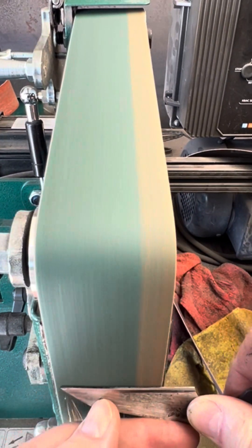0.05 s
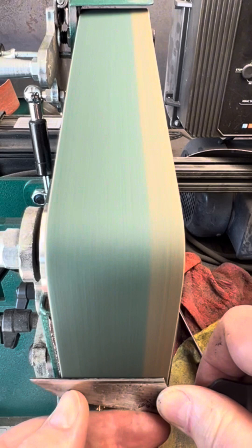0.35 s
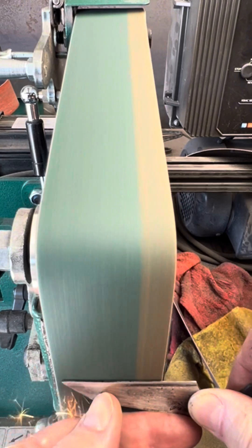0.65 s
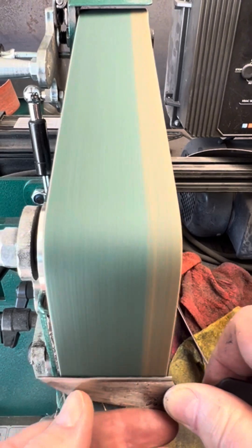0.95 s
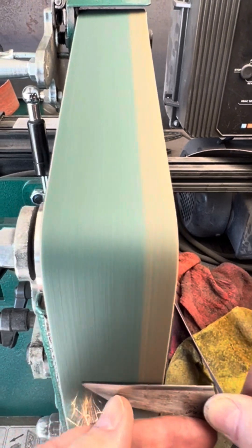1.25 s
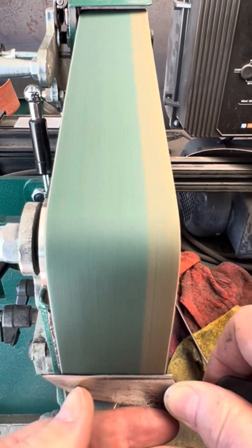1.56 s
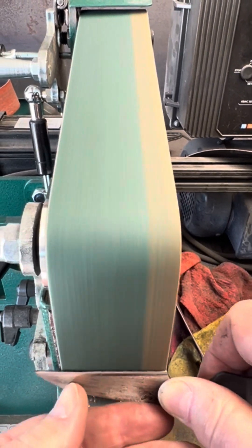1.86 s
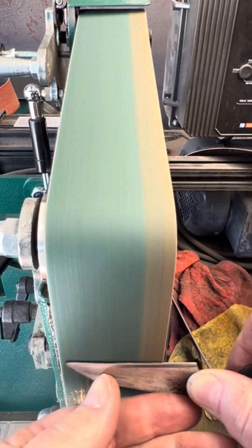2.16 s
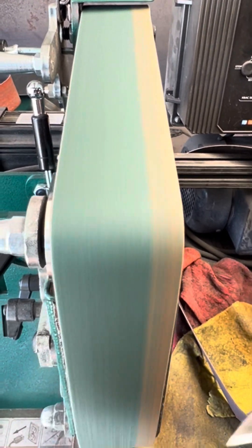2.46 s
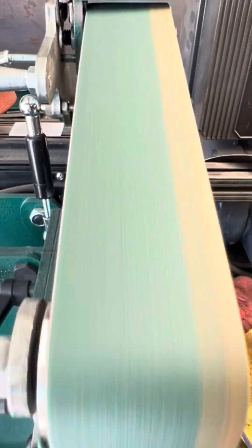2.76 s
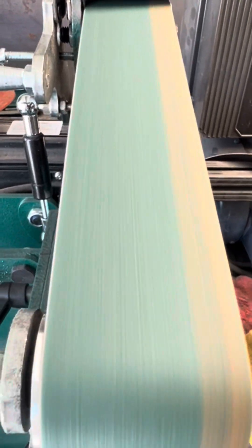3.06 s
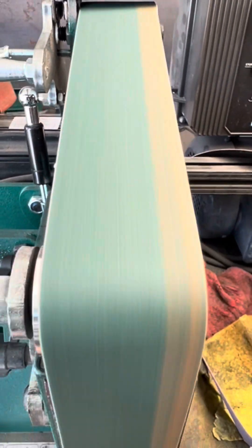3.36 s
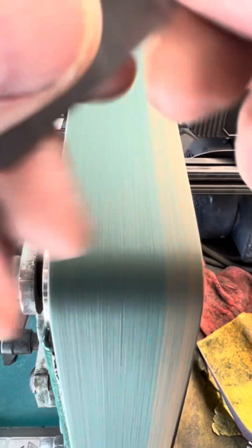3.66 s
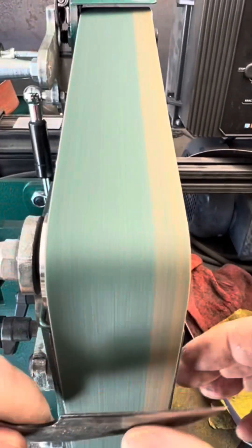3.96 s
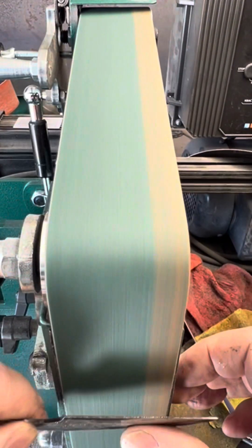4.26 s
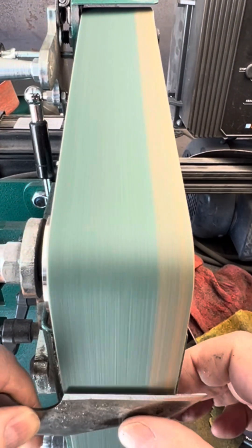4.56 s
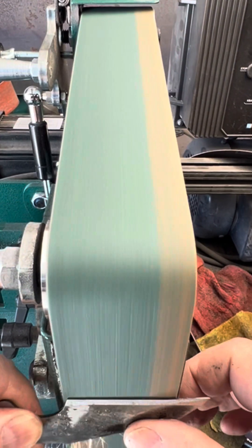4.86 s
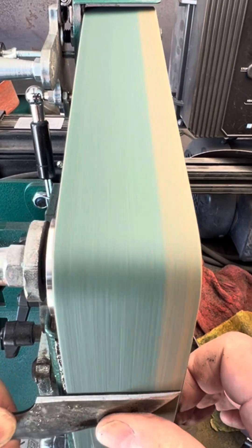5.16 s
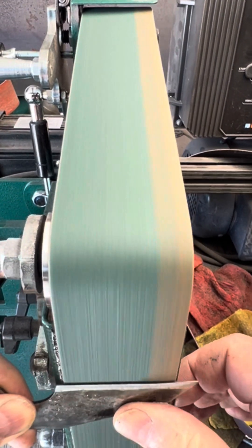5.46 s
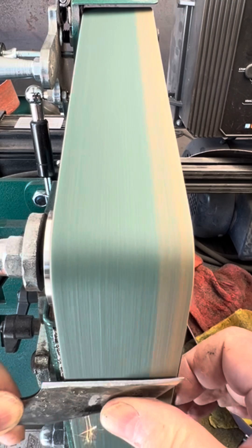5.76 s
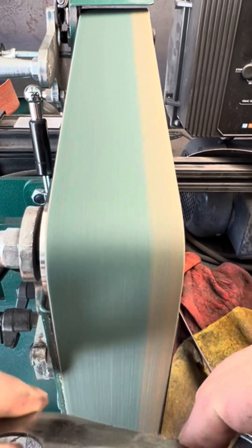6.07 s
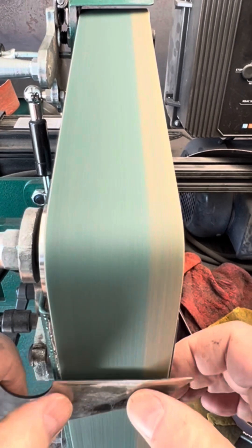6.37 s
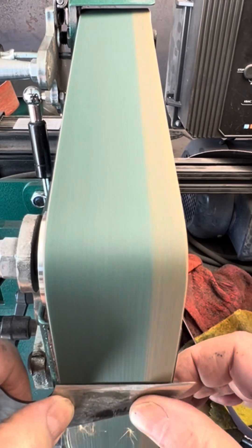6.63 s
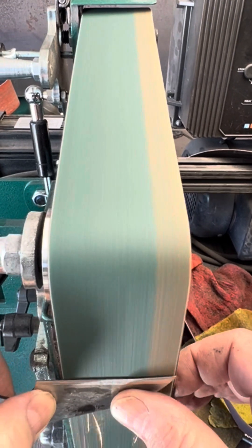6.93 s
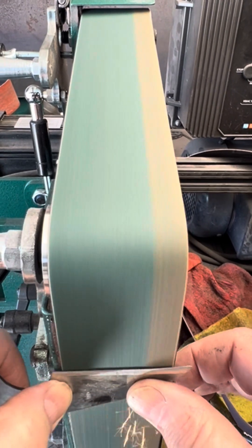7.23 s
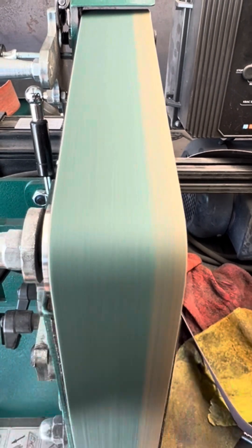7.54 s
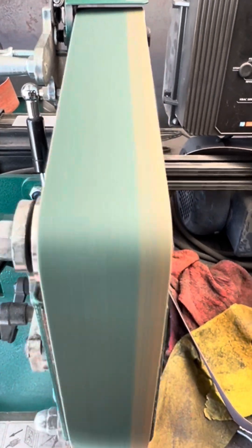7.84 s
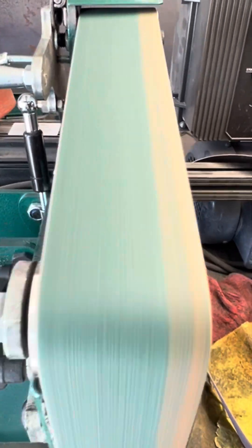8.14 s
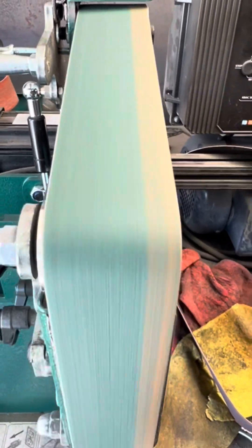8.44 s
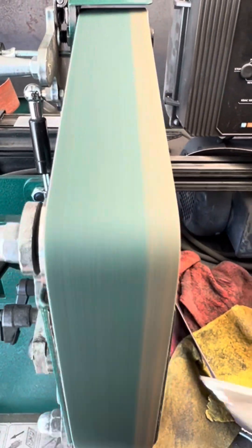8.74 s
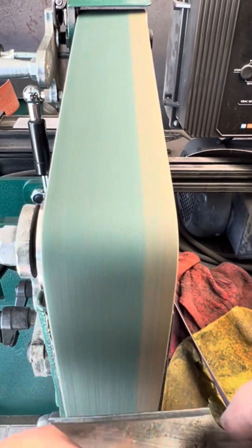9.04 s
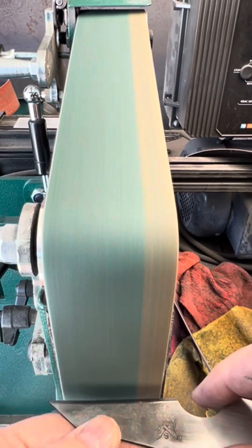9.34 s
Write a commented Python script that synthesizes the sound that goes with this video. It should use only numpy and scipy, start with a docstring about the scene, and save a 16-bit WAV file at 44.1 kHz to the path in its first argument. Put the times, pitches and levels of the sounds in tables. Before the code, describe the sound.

Three high, hissing passes of a steel blade on an abrasive belt, over the close whine and rapid knocking of a running belt grinder.

```python
"""In a workshop, close to a running belt grinder, a steel blade is pressed on the belt three times.
The belt repeats its hiss and the knock of its splice every lap; the drive whines and sags under load.
Grit tears at the steel, which rings very high, first on one face, then twice on the other.
Faint hums, three ticks, puffs of air on the microphone and one soft bump pass by.
Gain control ducks the machine under each pass and lets it swell again in the pauses."""
import sys
import numpy as np
from scipy import signal
from scipy.fft import rfft, irfft
from scipy.io import wavfile
from scipy.ndimage import uniform_filter1d

SR = 44100
rng = np.random.default_rng(int(sys.argv[2]) if len(sys.argv) > 2 else 0)


def generate_wav(sig):
    """Save sig (samples, or channels by samples) to the path in sys.argv[1] as 16-bit PCM at SR."""
    pcm = np.round(np.clip(np.atleast_2d(sig).T, -1, 1) * 32767).astype(np.int16)
    wavfile.write(sys.argv[1], SR, pcm)


N = 418950
T, BIN_HZ = np.arange(N) / SR, np.fft.rfftfreq(N, 1 / SR)
LAP_HZ, WHINE_CYCLES_PER_LAP, BAND_LIMIT_HZ = 23.45, 47.48, 15760
LAP_HARMONICS_HZ = np.arange(0, BAND_LIMIT_HZ + 500, LAP_HZ)


def amp(db):
    """Decibels to gain."""
    return 10 ** (np.asarray(db) / 20)


def unit(x):
    """Scales to rms 1."""
    return x / np.sqrt(np.mean(abs(x) ** 2) + 1e-20)


def curve(points, t=T):
    """An automation curve read at the times t."""
    return np.interp(t, *np.transpose(points))


def spectrum_db(points, hz):
    """An EQ curve read on a log-frequency axis."""
    f, db = np.transpose(points)
    return np.interp(np.log(hz + 1), np.log(f), db)


def bell(x, centre, width):
    """A smooth hump of height 1."""
    return np.exp(-2 * ((x - centre) / width) ** 2)


def peaks_db(peaks, hz):
    """The boost or cut of a set of resonances."""
    return sum(db / (1 + (2 * (hz - f) / width) ** 2) for f, width, db in peaks)


def eq(x, gain_db):
    """Filters x by one gain per bin of BIN_HZ."""
    return irfft(rfft(x) * amp(gain_db), N)


def moving_eq(x, gain_db):
    """Filters x by gain_db(f, t), which moves in time."""
    f, t, frames = signal.stft(x, SR, nperseg=512, noverlap=384)
    return signal.istft(frames * amp(gain_db(f[:, None], t)), SR, nperseg=512, noverlap=384)[1][:N]


def noise(points):
    """Steady noise of a given spectrum, rms 1."""
    return unit(eq(rng.standard_normal(N), spectrum_db(points, BIN_HZ)))


def drift(rate_hz):
    """A random wobble, rms 1."""
    return unit(irfft(rfft(rng.standard_normal(N)) * bell(BIN_HZ, 0, 2 * rate_hz), N))


def looped(harmonics, laps, size=16384):
    """Plays one lap of the belt over and over."""
    return unit(np.interp(laps % 1, np.arange(size) / size, irfft(harmonics, size)))


# Belt speed, as the pitch of the drive whine: t/s, f/Hz
WHINE_PITCH = [(0.0, 1125.8), (0.06, 1130.0), (0.16, 1114.1), (0.48, 1109.5), (0.56, 1134.2), (0.7, 1132.8),
               (0.78, 1109.8), (0.86, 1116.8), (0.96, 1132.4), (1.24, 1134.6), (1.3, 1108.0),
               (1.42, 1113.2), (1.58, 1111.6), (1.65, 1132.5), (1.76, 1110.7), (1.9, 1135.8),
               (2.06, 1114.4), (2.18, 1123.9), (2.28, 1114.4), (3.2, 1113.0), (4.56, 1108.7),
               (4.67, 1098.1), (4.85, 1115.5), (5.5, 1114.3), (5.68, 1135.8), (5.92, 1114.1),
               (5.99, 1127.1), (6.41, 1127.1), (6.46, 1100.5), (6.8, 1112.7), (6.89, 1126.0), (7.0, 1110.2),
               (7.2, 1108.7), (7.27, 1120.2), (7.45, 1140.4), (7.55, 1128.6), (8.2, 1122.3), (9.5, 1117.5)]
def belt_laps(start_lap=0.211):
    """Counts the laps of the belt, which slows whenever the hand leans on the blade."""
    return start_lap + np.cumsum(curve(WHINE_PITCH)) / SR / WHINE_CYCLES_PER_LAP


# Tone of the belt's hiss: f/Hz, level/dB
HISS_SPECTRUM = [(150, -37), (400, -3), (950, -7.5), (1450, -3), (2200, 0), (3000, -0.5), (4200, -2),
                 (5500, 8.5), (7000, 4), (8300, 9.5), (10500, 0), (13200, -0.5), (14500, -1), (15700, -6)]
# Resonances in the hiss: f/Hz, width/Hz, boost/dB
HISS_PEAKS = [(3530, 130, 5), (3573, 150, 9.5), (6020, 140, 0), (6550, 71, 9.5), (7490, 75, 10),
              (7740, 42, 10.5), (7964, 99, 8.5), (8310, 100, 13), (8490, 240, 3.5)]
# High shelf riding on the hiss: t/s, boost/dB
HISS_SHELF = [(2.47, 9.5), (2.6, 5), (3.2, 5), (3.55, 8), (3.9, 10), (6.4, 10.5), (7.82, 8.5), (7.92, 5),
              (8.3, 4.5), (8.9, 8), (9.5, 11.5)]
def belt_hiss(laps, level_db=-23, air_db=-15, swell_db=1.32, swell_lap=0.13):
    """The same grit passes every lap, so the hiss loops, swelling behind the splice, over fresh air."""
    hz = LAP_HARMONICS_HZ
    scatter_db = 4 * np.minimum(rng.standard_normal(len(hz)), 1.6)
    grit = amp(spectrum_db(HISS_SPECTRUM, hz) + peaks_db(HISS_PEAKS, hz) + scatter_db)
    hiss = looped(grit * np.exp(2j * np.pi * rng.random(len(hz))) * (hz > 130), laps)
    hiss *= amp(swell_db * np.cos(2 * np.pi * (laps - swell_lap)))
    air = signal.sosfilt(signal.butter(4, 200, "high", fs=SR, output="sos"), noise(HISS_SPECTRUM))

    def tone_db(f, t):
        shelf_db = curve(HISS_SHELF, t) * np.clip((f - 8500) / 3500, 0, 1)
        # the blade swings past the microphone: its reflection lifts the middle and sweeps a notch
        notch_hz = 11200 - 8000 * (t - 3.71)
        reflection_db = 4 * bell(f, 5500, 2200) - 9 * bell(f, notch_hz, 1700)
        return level_db + shelf_db + bell(t, 3.69, 0.16) * reflection_db
    return moving_eq(hiss + amp(air_db) * air, tone_db)


# Wheels and frame, rung in turn by the splice: f/Hz, width/Hz, level/dB, delay/s
FRAME_MODES = [(393.5, 11, -7, 0.00481), (624.2, 22.4, 0.5, 0.00902), (782.7, 7.8, -5.5, .012),
               (824, 4.2, -6.5, 0.013), (1229, 29.8, 2, 0.0003), (1766, 39, -6.5, 0.00344)]
# The splice's crack on the wheel and its softer follow-up: f/Hz, width/Hz, level/dB, delay/s
CRACK_MODES = [(2200, 450, -11, -.0005), (3050, 700, -14, -.0005), (1800, 250, -15, .003),
               (3900, 700, -19, .0098)]
# The microphone leans over the wheel twice, bringing up knock and rush: t/s, nearness/0-1
MIC_NEARNESS = [(2.52, 0), (2.78, 0.89), (3.1, 0.67), (3.5, 0), (4.4, 0), (7.65, 0.06), (8.2, 0.15),
                (8.8, 0)]
def splice(laps, knock_db=-35.5, near_db=7.5, crack_db=-40.5, uneven_db=1.0, loaded_pitch=0.98):
    """Once a lap the belt's joint cracks and knocks over the wheels; the knock drops under the blade."""
    hz = LAP_HARMONICS_HZ

    def struck(modes, pitch=1, rise_to_decay=4.45):
        ring = 0
        for f, width, db, delay in modes:
            detune = 2j * (hz - f * pitch) / width
            mode = 1 / (1 + detune) / (1 + detune / rise_to_decay)  # swells, then dies away
            ring = ring + amp(db) * unit(mode * np.exp(-2j * np.pi * hz * delay))
        return looped(ring * (hz > 200), laps)
    load = np.clip(blade_load(), 0, 1)
    knock = np.sqrt(1 - load) * struck(FRAME_MODES) + np.sqrt(load) * struck(FRAME_MODES, loaded_pitch)
    knock *= amp(knock_db + near_db * curve(MIC_NEARNESS))
    crack = struck(CRACK_MODES) * amp(crack_db)
    return (knock + crack) * amp(uneven_db * drift(32))


# Low rush of the wheels: f/Hz, level/dB
RUSH_SPECTRUM = [(25, -46), (100, -40), (120, -20), (160, -18.5), (200, -11), (320, 2.5), (460, -6),
                 (560, -10), (1000, -8), (2500, -12.5), (6000, -17)]
def drive(laps, whine_db=-45.5, load_db=8, waver_db=1.5, rush_db=-38.5, near_db=2.5):
    """The whine of the drive, louder under load, over the rush of the wheels."""
    whine = np.sqrt(2) * np.sin(2 * np.pi * WHINE_CYCLES_PER_LAP * laps)
    whine *= amp(whine_db + load_db * blade_load() + waver_db * drift(62))
    rush = noise(RUSH_SPECTRUM) * amp(rush_db + near_db * curve(MIC_NEARNESS))
    return whine + rush


# Low gliding hums: start/s, end/s, first f/Hz, last f/Hz, relative level/dB
HUM_GLIDES = [(-.2, 0.735, 320, 249, -47), (1.404, 2.615, 230.4, 188, -51), (3.313, 4.294, 188, 181, -58.5),
              (4.307, 5.892, 204, 170.4, -51), (5.605, 6.29, 173.8, 153, -51.5),
              (6.999, 8.204, 240, 173, -52.5), (8.108, 9.312, 170, 180, -58.5),
              (8.893, 9.993, 318, 328, -43)]
def hums(level_db=-2, waver_db=3.0):
    """Faint low tones swell and fade, most of them sagging in pitch."""
    out = np.zeros(N)
    for start, end, first_hz, last_hz, db in HUM_GLIDES:
        progress = np.clip((T - start) / (end - start), 0, 1)
        phase = 2 * np.pi * np.cumsum(first_hz + (last_hz - first_hz) * progress) / SR
        out += amp(db) * 2 * np.sin(np.pi * progress) * np.sin(phase)
    return out * amp(level_db + waver_db * drift(9))


def contact_db(bite, t, land_db_per_s=396, lift_db_per_s=750):
    """The gate of one pass: 0 dB with the blade on the belt, falling away fast on either side."""
    start, end = bite[0][0], bite[-1][0]
    return -land_db_per_s * np.maximum(start - t, 0) - lift_db_per_s * np.maximum(t - end, 0)


def blade_load():
    """1 while the blade is on the belt, 0 while the belt runs free."""
    return sum(amp(contact_db(bite, T)) for bite in PASS_BITES)


def grit_strikes(laps, grain_db=-0.5, spots_db=1.2, flutter_db=0.28, splice_db=4, ripple_db=2.5):
    """Grit hits the steel in clumps; the belt's high spots and its splice bite harder once a lap."""
    hz = LAP_HARMONICS_HZ
    phases = np.exp(2j * np.pi * rng.random(len(hz)))
    high_spots = looped(phases * (hz > 0) / (1 + (hz / 350) ** 2), laps)
    clumps_db = grain_db * drift(1600) + spots_db * high_spots + flutter_db * drift(25)
    clumps_db += splice_db * bell(laps % 1, centre=0.024, width=0.0067)
    strikes = rng.standard_normal(N) * amp(clumps_db)
    # the blade's many small, close modes ripple the spectrum
    mode_hz = np.arange(1000) * 45
    ripple = np.interp(BIN_HZ, mode_hz, rng.standard_normal(len(mode_hz)))
    return unit(eq(strikes, ripple_db * ripple))


# Ring of the blade held on its first face: f/Hz, width/Hz, boost/dB
FIRST_FACE_MODES = [(3780, 420, 7), (4420, 160, 1), (5540, 510, 16.5), (6560, 530, 14), (7550, 200, 10),
                    (8140, 240, 13.5), (9200, 470, 7), (9900, 1100, 2.5), (10700, 160, 2),
                    (12500, 320, 6.5), (13330, 1040, 15)]
# Change in that ring as the blade only skims the belt: f/Hz, width/Hz, gain/dB
SKIM_MODES = [(16000, 1200, 14), (3720, 350, 6), (12700, 2000, -3.5)]
def first_face_db(f, t, free_hz=1135, sag_hz=24):
    """The first face rings thinner and higher whenever the hand eases off and the belt speeds up."""
    pressure = np.clip((free_hz - curve(WHINE_PITCH, t)) / sag_hz, 0, 1)
    return peaks_db(FIRST_FACE_MODES, f) + (1 - pressure) * peaks_db(SKIM_MODES, f)


# Flares of ring at the contact spot: t/s, length/s, f/Hz, width/Hz, boost/dB
RING_FLARES = [(.3, 0.43, 6450, 700, 2.5), (0.523, 0.21, 14700, 1300, 7.5), (2.144, 0.11, 14600, 1400, 8.5),
               (4.688, 0.085, 11000, 1700, 9.5), (4.722, 0.038, 3750, 250, 14),
               (4.962, 0.14, 7300, 1320, 11.5), (5.41, 0.28, 6960, 1530, 16),
               (5.897, 0.19, 7330, 1100, 13.5), (6.475, 0.19, 11700, 1300, 8.5),
               (6.513, 0.25, 5000, 1100, 11), (6.703, 0.15, 7300, 2000, 7.5), (6.8, 0.27, 15800, 1790, -1),
               (6.852, 0.95, 3780, 800, 2.5), (7.114, 0.19, 6670, 1970, 13), (7.367, 0.2, 9500, 900, 3)]
def flares_db(f, t, length_share=0.84, glide=0.079):
    """As the blade rocks, a ring swells, sinks in pitch with the pressure and climbs as it fades."""
    out = 0
    for at, length, centre, width, db in RING_FLARES:
        swell = bell(t, at, length_share * length)
        ring_hz = centre * (1 + glide * (1 - swell))
        out = out + db * swell * bell(f, ring_hz, width)
    return out


# Bite of the blade into the belt, one curve a pass: t/s, level/dB
PASS_BITES = [
    [(0, -21), (.1, -21.5), (.19, -18), (.4, -17.5), (.51, -16.5), (.62, -19), (.73, -19.5), (.86, -16),
     (.96, -15), (1.1, -22.5), (1.28, -25), (1.46, -15), (1.6, -15.5), (1.76, -14.5), (1.87, -16.5),
     (1.99, -13.5), (2.1, -17), (2.17, -25)],
    [(4.6, -19.5), (4.67, -15), (4.92, -11), (5.05, -12.5), (5.2, -13), (5.48, -12.5), (5.72, -13),
     (5.86, -13.5), (5.925, -13.5)],
    [(6.47, -15.5), (6.6, -16), (6.74, -10), (6.95, -8.5), (7.05, -13.5), (7.16, -15), (7.25, -11.5),
     (7.36, -13.5), (7.43, -17)],
]
# Raw scrape of grit on steel, under the blade's ring: f/Hz, level/dB
SCRAPE_SPECTRUM = [(60, -41), (400, -14.5), (1500, -7), (3000, -5.5), (4300, -6), (5300, -12.5), (7000, -4),
                   (9000, 3.5), (10500, 5.5), (11800, 8), (13400, 7), (14400, 14), (15700, 8)]
def grinding(laps, bite, face_db, level_db=-2, knee_db=-19, squash=0.56, wander_db=1.58):
    """One pass of the blade: a scrape of grit, coloured by the ringing steel."""
    def tone_db(f, t):
        bite_db = curve(bite, t) + contact_db(bite, t)
        # pressing harder feeds mostly the highest ring, so the bands below are held back
        held_db = squash * np.maximum(bite_db - knee_db, 0) * np.clip((12500 - f) / 2500, 0, 1)
        steel_db = spectrum_db(SCRAPE_SPECTRUM, f) + face_db(f, t) + flares_db(f, t)
        # the wandering contact favours now some modes, now others
        patches = uniform_filter1d(rng.standard_normal((len(f), len(t))), size=5, axis=0)
        wander = unit(uniform_filter1d(patches, size=40, axis=1))
        return level_db + bite_db - held_db + steel_db + wander_db * wander
    return moving_eq(grit_strikes(laps), tone_db)


# Sharp ticks: t/s, relative level/dB
TICK_HITS = [(3.0615, -12), (3.1085, -13.5), (8.324, -8.5)]
# A tick's bright snap, then its lower clack: f/Hz, width/Hz, level/dB, delay/s
TICK_MODES = [(4500, 260, -1.5, 0), (2350, 90, -3, .0003), (1480, 200, -3, .0025), (2050, 150, -5, .003)]
def ticks(level_db=-2, scatter_db=-28, scatter_t60_s=0.072):
    """Short hard ticks, like crumbs of grit flung at the frame, scattered by nearby surfaces."""
    strikes, t = np.zeros(N), T[:4096]
    for at, db in TICK_HITS:
        strikes[round(at * SR)] = amp(db)
    ring = 0
    for hz, width, db, delay in TICK_MODES:
        age = np.maximum(t - delay, 0)
        ring = ring + amp(db) * np.sin(2 * np.pi * hz * age) * np.exp(-np.pi * width * age)
    ring = signal.sosfilt(signal.butter(2, 700, "high", fs=SR, output="sos"), ring)
    paths = (t == 0) + amp(scatter_db - 60 * t / scatter_t60_s) * rng.standard_normal(len(t))
    return amp(level_db) * signal.oaconvolve(strikes, signal.fftconvolve(ring, paths))[:N]


# Ring of the blade held on its second face: f/Hz, width/Hz, boost/dB
SECOND_FACE_MODES = [(3640, 190, 4), (5420, 520, 9.6), (7400, 400, 5.7), (8180, 290, 13), (9850, 260, 3.4),
                     (11160, 130, 4.8), (12660, 1100, 6.1), (13470, 1390, 11.5)]
# Ring of the tip: f/Hz, width/Hz, full boost/dB
TIP_MODES = [(5210, 560, 10.5), (3750, 470, 4)]
def second_face_db(f, t):
    """The contact slides toward the tip, whose ring fades in over the first half of each pass."""
    slide = 0
    for bite in PASS_BITES[1:]:
        start, end = bite[0][0], bite[-1][0]
        slide = slide + np.interp(t, [start, (start + end) / 2], [0, 1]) * (t < end + 0.1)
    return peaks_db(SECOND_FACE_MODES, f) + slide * peaks_db(TIP_MODES, f)


# Puffs of air: t/s, nominal length/s, level/dB
GUST_PUFFS = [(5.243, 0.022, -10.5), (5.586, 0.017, -25), (6.016, 0.027, -30.5)]
# Tone of a puff: f/Hz, level/dB
GUST_SPECTRUM = [(25, -45), (100, -44), (170, -19.5), (260, -4), (450, 0.5), (750, -5.5), (1200, -13.5),
                 (2200, -24.5), (4000, -41)]
def gusts():
    """Moving air buffets the microphone; each puff comes and goes abruptly."""
    envelope = sum(amp(db) * np.exp(-((T - at) / (1.79 * length)) ** 4) for at, length, db in GUST_PUFFS)
    return noise(GUST_SPECTRUM) * envelope


def gust_dips_db(f, t):
    """The low end dips briefly after each of the two stronger gusts."""
    return -(12 * bell(t, 5.365, 0.12) + 8 * bell(t, 5.69, 0.11)) / (1 + (f / 1400) ** 2)


def thump(at_s=8.884, hz=275, length_s=0.0043, level_db=-27):
    """A soft, dull bump of about one cycle."""
    return amp(level_db) * bell(T, at_s, length_s) * np.sin(2 * np.pi * hz * (T - at_s))


# Stereo width, as side against mid: f/Hz, level/dB
SIDE_SPECTRUM = [(300, -40), (1200, -49), (2700, -43), (4200, -44.5), (5400, -48), (6500, -4.5),
                 (7500, -14), (8200, -64), (15000, -39.5)]
# Nearby surfaces cancel some bands and lift one: f/Hz, width/Hz, gain/dB
SURFACE_EQ = [(1402, 43, -6.5), (2904, 95, -2.5), (3498, 52, -16), (4120, 50, -3.5), (6200, 66, 4),
              (7340, 260, -2), (7690, 75, -5), (8345, 124, -20)]
def scene(left_pans_db=(0.7, 0.2)):
    """The belt's laps clock machine and blade. Nearly mono, with the first pass dead centre."""
    laps = belt_laps()
    sides = np.array([[1], [-1]])
    machine = belt_hiss(laps) + splice(laps) + drive(laps) + hums()
    mix = moving_eq(machine, gust_dips_db) + ticks() + thump() + gusts()
    for bite, pan_db in zip(PASS_BITES[1:], left_pans_db):
        mix = mix + grinding(laps, bite, second_face_db) * amp(pan_db * sides)
    spread = 1j * amp(spectrum_db(SIDE_SPECTRUM, BIN_HZ))  # a quarter cycle off the mid
    mix += sides * irfft(rfft(mix.mean(0)) * spread, N)
    mix += grinding(laps, PASS_BITES[0], first_face_db)
    return eq(mix, peaks_db(SURFACE_EQ, BIN_HZ))


def gain_control(x, threshold_db=-31, slope=0.77, attack_s=0.25, release_db_per_s=5, first_cut_db=14.5):
    """Ducks everything under the loud grinding and creeps back up in the pauses."""
    hop = 256
    power = uniform_filter1d(x.mean(0) ** 2, size=2048)[::hop]
    power_db = 10 * np.log10(abs(power) + 1e-12)
    cut_db, cuts_db = first_cut_db, []
    for target_db in slope * np.maximum(power_db - threshold_db, 0):
        cut_db += hop / SR * max((target_db - cut_db) / attack_s, -release_db_per_s)
        cuts_db.append(cut_db)
    return x * amp(-np.interp(T, T[::hop], cuts_db))


def record(dry):
    """Gain control, then a steep low-pass."""
    lowpass = signal.firwin(1023, BAND_LIMIT_HZ, window=("kaiser", 9), fs=SR)
    return signal.oaconvolve(gain_control(dry), lowpass[None], "same", axes=1)


dry = scene()
out = record(dry)
generate_wav(out)
```